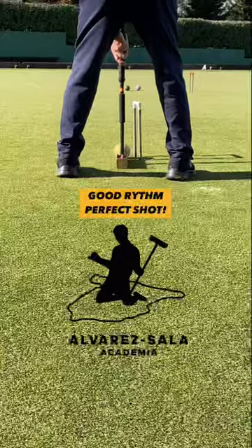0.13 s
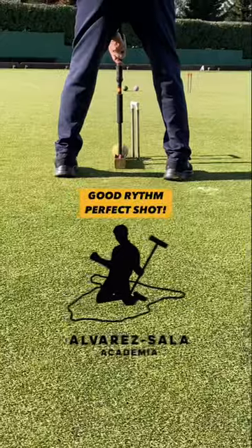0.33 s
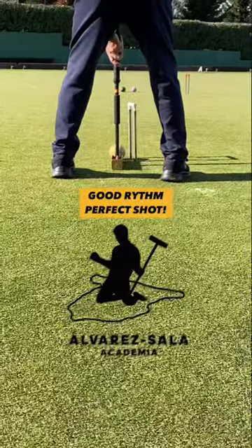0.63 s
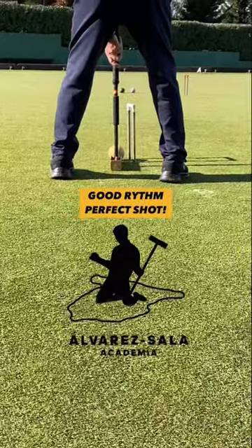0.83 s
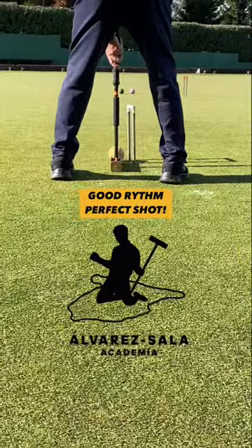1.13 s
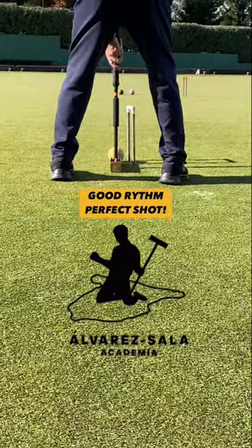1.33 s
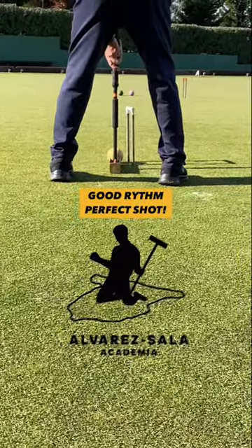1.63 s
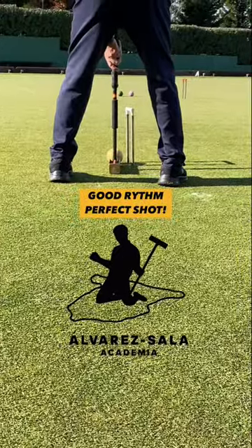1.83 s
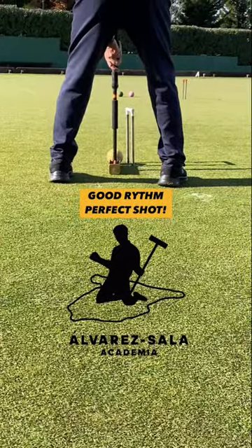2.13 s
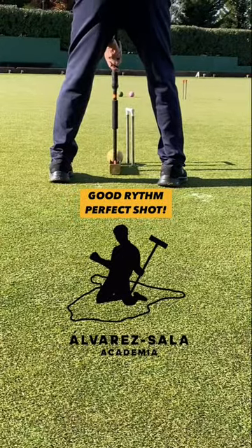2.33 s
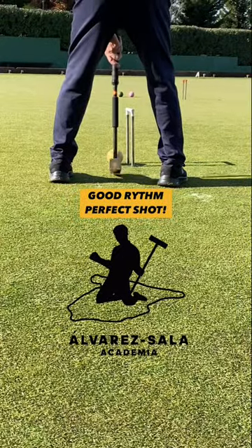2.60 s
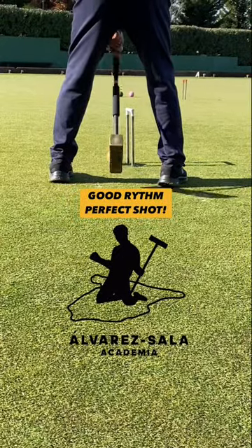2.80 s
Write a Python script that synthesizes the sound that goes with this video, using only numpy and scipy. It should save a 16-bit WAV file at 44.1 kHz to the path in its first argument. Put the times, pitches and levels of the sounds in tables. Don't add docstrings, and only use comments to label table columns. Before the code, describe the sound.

A distant engine drones low throughout, slowly rising in pitch over muffled, receding tyre roar, after a blink of silence. Wind puffs lightly until 0.8 s. At 0.33 and 0.4 s two dull finger taps knock the phone, with a short slide to 0.55 s. Cloth rustles faintly around 0.8 and 1.3-1.6 s; tiny dry ticks and a brush come at 2.5 s. Leaves hiss very softly.

```python
import sys
import numpy as np
from scipy import signal
from scipy.fft import rfft, irfft
from scipy.io import wavfile
from scipy.ndimage import uniform_filter1d

SR = 44100
rng = np.random.default_rng(int(sys.argv[2]) if len(sys.argv) > 2 else 0)


def decibels_to_gain(level_db):
    exponent = np.asarray(level_db, float) / 20
    return 10 ** exponent


def file_out(sig):
    cols = np.atleast_2d(sig).T
    lim = np.clip(cols, -1, 1)
    pcm = np.round(lim * 32767).astype(np.int16)
    wavfile.write(sys.argv[1], SR, pcm)


N = 130536


def read(points, hz):
    f, value = np.transpose(points)
    return np.interp(np.log(hz + 1), np.log(f + 1), value)


def evened(x):
    return x / np.sqrt(np.mean(x ** 2) + 1e-20)


def band_pass(x, order, band_hz):
    return signal.sosfilt(signal.butter(order, band_hz, "band", fs=SR, output="sos"), x)


def stroke(start, rise, hold, fall, db):
    t = np.arange(N) / SR - start
    shape = np.minimum(t / rise, 1 + (rise + hold - t) / fall)
    return decibels_to_gain(db) * np.clip(shape, 0, 1) ** 1.8


def strokes(table):
    return sum(stroke(*row) for row in table)


def field(size, patchy_db, span_hz, span_s):
    frames, hz = 4 * N // size + 5, np.fft.rfftfreq(size, 1 / SR)
    a, b, c, d, patch = rng.standard_normal((frames, len(hz), 5)).T
    patch = uniform_filter1d(patch, 1 + int(span_hz * size / SR), axis=0)
    patch = uniform_filter1d(patch, 1 + int(4 * span_s * SR / size), axis=1)
    patches = decibels_to_gain(patchy_db * evened(patch))
    t = np.arange(frames) * size / 4 / SR
    return hz[:, None], t, (a + 1j * b) * patches, (c + 1j * d) * patches


def sound(z):
    size = 2 * (z.shape[1] - 1)
    return evened(signal.istft(z, nperseg=size, noverlap=3 * size // 4)[1][:, :N])


def hiss(colour, patchy_db):
    hz, t, a, b = field(size=256, patchy_db=patchy_db, span_hz=1500, span_s=.012)
    same = 0.95
    return sound(np.array([a, same * a + np.sqrt(1 - same ** 2) * b]) * decibels_to_gain(read(colour, hz)))


def ports(x):
    hz = np.fft.rfftfreq(N, 1 / SR)
    turn = np.exp(-1j * np.pi * np.maximum(hz - 4180, 0) / 6250)
    return np.array([irfft(rfft(x[0]) / turn, N), irfft(rfft(x[1]) * turn, N)])


# (time [s], firing rate [Hz], first order [dB], second order [dB], third order [dB])
ENGINE_RUN = [(0, 45.75, -41.5, -48, -56), (.2, 46.2, -43.5, -36.5, -51), (.35, 47.06, -45.5, -55.5, -52),
              (0.569, 47.22, -44.5, -45, -55), (.75, 47.68, -46.5, -44.5, -51),
              (.95, 48.33, -44, -44.5, -42.5), (1.12, 48.4, -37.5, -42, -41),
              (1.25, 48.55, -44.5, -41.5, -41), (1.399, 49.12, -39.5, -40, -42.5),
              (1.53, 49.16, -61, -42, -42), (1.75, 49.48, -35.5, -36, -44),
              (1.949, 50.12, -39.5, -40.5, -44), (2.102, 50.33, -62, -37.5, -47),
              (2.279, 50.75, -40.5, -37.5, -46), (2.419, 51.14, -46.5, -37, -48),
              (2.6, 51.76, -40, -37.5, -55), (2.749, 52.12, -34.5, -38, -50), (2.96, 52.8, -35.5, -42, -44)]
# (multiple of firing rate, level [dB])
WEAK_ORDERS = [(1.5, -48), (2.5, -64.5), (4, -61.5), (6, -61.5)]


def engine():
    t, rows = np.arange(N) / SR, np.transpose(ENGINE_RUN)
    waver_hz = 6 * np.geomspace(.1, 1, 20)
    waver = evened(sum(np.sin(2 * np.pi * (f * t + rng.random())) / np.sqrt(f) for f in waver_hz))
    turns = np.cumsum(np.interp(t, rows[0], rows[1]) * (1 + 0.0064 * waver)) / SR
    out = np.zeros(N)
    for k in (1, 2, 3):
        out += np.interp(t, rows[0], decibels_to_gain(rows[1 + k])) * np.cos(2 * np.pi * k * turns)
    for k, db in WEAK_ORDERS:
        out += decibels_to_gain(db) * np.cos(2 * np.pi * (k * turns + rng.random()))
    out *= np.sqrt(2)
    return np.array([out, np.roll(out, 3)])


# (time [s], level [dB], starting pitch [Hz], 60 dB decay [s])
FINGER_TAPS = [
    (.3345, -34, 900, .06),
    (.343, -37, 220, .08),
    (.361, -43, 900, .1),
    (.398, -34.5, 900, .045),
    (.405, -34, 400, .045),
    (.428, -44, 600, .05),
]


def taps():
    out, t = np.zeros(N), np.arange(4000) / SR
    for start, db, hz, t60 in FINGER_TAPS:
        glide = 190 + (hz - 190) * np.exp(-t / .003)
        grit = evened(band_pass(rng.standard_normal(len(t)), 4, [250, 1300]))
        ring = np.sin(2 * np.pi * np.cumsum(glide) / SR) + .4 * grit
        attack = np.minimum(t / .0015, 1)
        out[round(start * SR):][:len(t)] += decibels_to_gain(db - 60 * t / t60) * attack * ring
    rub = evened(band_pass(rng.standard_normal(N), 5, [450, 1400]))
    out += stroke(start=.335, rise=.011, hold=.205, fall=.015, db=-58) * rub
    middle = .1
    return out * np.array([[1 + middle], [middle - 1]])


# (start [s], rise [s], hold [s], fall [s], level [dB])
CRISP_STROKES = [
    (0.783, 0.017, .03, .03, -78.5),
    (1.3, .08, .22, .035, -76.5),
]
# (frequency [Hz], density [dB per Hz])
CRISP_COLOUR = [(2000, -8.5), (4500, 5), (6500, -2.5), (9000, -2), (12300, -1), (13700, -13), (14600, -3.5),
                (16000, -5.5)]
# (start [s], rise [s], hold [s], fall [s], level [dB])
DULL_STROKES = [
    (.775, .03, .046, .05, -76),
    (.328, .006, .012, .03, -91),
    (.395, .01, .015, .02, -86),
    (0.441, 0.1, .03, .02, -87),
    (.535, .006, .1, .02, -83.5),
    (0.878, 0.015, .03, .02, -79.5),
    (1.0, 0.25, 0.045, 0.093, -81.5),
    (2.45, .025, 0.052, 0.028, -79.5),
]
# (frequency [Hz], density [dB per Hz])
DULL_COLOUR = [(2000, -15.5), (4500, 1.5), (6500, -4), (9000, -6.5), (11000, -4.5), (13000, -11),
               (14500, -21.5), (16000, -32.5)]


def cloth():
    crisp = strokes(CRISP_STROKES) * hiss(CRISP_COLOUR, patchy_db=0.0)
    dull = strokes(DULL_STROKES) * hiss(DULL_COLOUR, patchy_db=2.5)
    return ports(crisp + dull)


# (time [s], level [dB], pitch [Hz])
CLOTH_SNAPS = [
    (.3345, -63, 5200),
    (.335, -64, 6200),
    (.553, -71, 5000),
    (.6395, -67.5, 10800),
    (.641, -71.5, 4800),
    (.823, -64, 10280),
    (2.488, -64.5, 6990),
    (2.501, -61, 13300),
    (2.52, -73.5, 10480),
]


def snaps():
    out, t = np.zeros((2, N)), np.arange(200) / SR
    for start, db, hz in CLOTH_SNAPS:
        out[:, round(start * SR):][:, :len(t)] += decibels_to_gain(db - 60 * t / .004) * np.sin(2 * np.pi * hz * t)
    return ports(out)


# (start [s], rise [s], hold [s], fall [s], level [dB])
WIND_PUFFS = [
    (0.025, 0.018, 0.33, .05, -51),
    (.38, 0.027, .12, .03, -59),
    (0.588, .02, .04, .02, -62),
    (0.662, .02, .07, .02, -60),
    (0.774, 0.018, 0.045, .015, -64),
    (2.53, .015, .03, .015, -68),
]


def wind():
    return strokes(WIND_PUFFS) * evened(band_pass(rng.standard_normal(N), 4, (32, 62)))


# (frequency [Hz], density [dB per Hz])
LEAF_COLOUR = [(2000, -22), (4000, -2), (6000, -2.5), (8000, -3), (11000, -7.5), (12500, -4), (14000, -20),
               (16000, -26)]
# (start [s], rise [s], hold [s], fall [s], level [dB])
HEDGE_GUSTS = [
    (.25, .3, 1.8, .3, -85.5),
    (0.301, 0.033, .03, 0.038, -84),
    (0.398, 0.076, 0.11, .12, -86),
    (0.76, .04, 0.085, 0.055, -86),
    (1.098, .3, 0.18, 0.072, -85),
    (2.444, .03, .05, 0.051, -86),
]
# (frequency [Hz], density [dB per Hz])
HEDGE_COLOUR = [(2500, -12.5), (3800, -2.5), (4800, -0.5), (6300, -6.5), (7500, -13.5), (10000, -30.5)]


def hedge():
    leaves = decibels_to_gain(-89.5) * hiss(LEAF_COLOUR, patchy_db=0.5)
    return ports(leaves + strokes(HEDGE_GUSTS) * hiss(HEDGE_COLOUR, patchy_db=4.5))


# (middle [s], length [s], pitch [Hz], level [dB], left over
# right [dB])
PASSING_HUMS = [(0.11, 0.35, 260, -45.5, 5), (0.3, 0.1, 296, -45.5, -8.5), (1.153, 0.25, 127, -40.5, 0),
                (2.564, 0.32, 78, -35, -1), (.406, 0.026, 2550, -57.5, -0.5), (.404, .02, 1900, -59, 2),
                (0.36, .025, 3500, -64.5, 0), (.335, 0.011, 1400, -60, 2), (.57, 0.095, 133, -33.5, 1),
                (.79, .1, 102, -39.5, 0), (2.35, 0.28, 128, -45.5, 0), (2.6, 0.29, 330, -54, 0.5),
                (2.3, 0.17, 700, -56, -0.5), (1.25, 0.15, 3300, -71, 1), (.34, .02, 5600, -79, 0),
                (.12, 0.32, 165, -47, 0.5), (2.8, 0.13, 120, -47, -1.5), (1.48, .3, 230, -50, -1),
                (2.036, .16, 230, -47.5, -1), (2.27, .03, 110, -28.5, -1), (2.8, .2, 220, -50, 1),
                (1.52, 0.35, 2950, -67.5, 3.5), (2.85, 0.24, 800, -56, -0.5),
                (2.55, 0.23, 850, -58.5, -0.5), (2.42, .15, 280, -51, 0.5), (1.5, 0.051, 225, -46, 0),
                (2.56, .06, 130, -41.5, -1), (2.8, .1, 330, -52, -1), (.546, .02, 10600, -89, 0),
                (.6, .09, 9100, -88, -2), (0.59, .04, 6300, -85, 1), (1.014, .008, 660, -51.5, -2),
                (1.988, 0.0073, 880, -49, -0.5), (2.096, 0.0073, 800, -50, -3.5),
                (2.697, .008, 800, -55, 1), (1.9, 0.21, 160, -56, -3)]


def swells():
    t, out = np.arange(N) / SR, np.zeros((2, N))
    for mid, length, hz, db, pan_db in PASSING_HUMS:
        bump = np.cos(np.pi * np.clip((t - mid) / length, -.5, .5))
        drift = evened(uniform_filter1d(rng.standard_normal(N), 1 + int(SR / hz * 2)))
        tone = np.sin(2 * np.pi * hz * np.cumsum(1 + .06 * drift) / SR)
        out += decibels_to_gain(db + pan_db * np.array([[.5], [-.5]])) * bump * tone
    return out


# (frequency [Hz], density [dB per Hz])
ROAR = [(50, -7.5), (100, -6.5), (200, -11.5), (300, -16), (600, -27), (1130, -31.5), (1380, -42),
        (3000, -45)]
# (frequency [Hz], gain [dB])
AIR_LOSS = [(3050, 1.5), (3450, -6), (4250, -11.5), (4500, -20), (5300, -24.5), (6500, -33.5), (8000, -46)]
# (frequency [Hz], side under middle [dB])
ROAR_WIDTH = [(80, -31), (200, -22), (350, -12.5), (800, -10), (1500, -7.5), (1900, -11), (2800, -12),
              (4500, -14)]
# (time [s], level [dB])
DISTANCE = [(0, 2.5), (.3, 2), (.6, 1.5), (1, -0.5), (1.5, 0.5), (1.9, -1.5), (2.4, -0.5), (2.75, -3),
            (2.96, 0.5)]
# (frequency [Hz], share)
DISTANCE_SHARE = [(100, 0.033), (300, 0.12), (900, 0.5), (2000, 1.7), (3000, .9), (3600, 0.05),
                  (4200, -0.29), (5500, 0.22)]


def traffic():
    hz, t, mid, side = field(size=2048, patchy_db=1.46, span_hz=149.1, span_s=.08)
    lean = .13 * np.exp(-np.log((hz + 1) / 600) ** 2 / .6)
    side = decibels_to_gain(read(ROAR_WIDTH, hz)) * side - lean * mid
    distance = read(DISTANCE_SHARE, hz) * np.interp(t, *np.transpose(DISTANCE))
    level = decibels_to_gain(read(ROAR, hz) + read(AIR_LOSS, hz) + distance)
    far = decibels_to_gain(-39) * sound(np.array([mid + side, mid - side]) * level)
    shaded = signal.sosfiltfilt(signal.butter(2, (550, 1100), "band", fs=SR, output="sos"), far)
    return far - stroke(start=.33, rise=.02, hold=.07, fall=.03, db=-6) * shaded


# (frequency [Hz], side gain [dB])
NARROW_MIDDLE = [(2900, 0), (3200, -22), (4150, -18), (4250, 8), (4650, 8), (4900, -18), (5150, -14),
                 (5400, 0)]
# (frequency [Hz], side gain [dB])
NARROW_TREBLE = [(9500, 0), (9700, -20), (11300, -20), (11600, 0), (13300, 0), (14300, -5), (15200, -12),
                 (15700, -20)]


def narrowed(side):
    hz, soft = np.fft.rfftfreq(N, 1 / SR), signal.windows.tukey(N, .004)
    return irfft(rfft(soft * side) * decibels_to_gain(read(NARROW_MIDDLE, hz) + read(NARROW_TREBLE, hz)), N)


def gaps(side):
    hz, t, z = signal.stft(side, SR, nperseg=1024)
    luck = uniform_filter1d(rng.standard_normal(z.shape[::-1]).T, 10, axis=0)
    luck = uniform_filter1d(luck, 5, axis=1)
    band = (hz > 1950) & (hz < 4150)
    shut = (luck < np.quantile(luck, .68)) & (t > .45) & band[:, None]
    return signal.istft(z * ~shut, SR, nperseg=1024)[1][:N]


# (from [s], to [s])
BASS_FOLDS = [(.5, .59), (.85, .89), (1.01, 1.09), (1.22, 1.3), (1.46, 1.55), (1.6, 1.83), (1.89, 2.0),
              (2.05, 2.18), (2.22, 2.27), (2.33, 2.36), (2.4, 2.53), (2.67, 2.74), (2.77, 2.79)]


def folded(side):
    t, hz = np.arange(N) / SR, np.fft.rfftfreq(N, 1 / SR)
    shut = uniform_filter1d(sum(1. * ((t > a) & (t < b)) for a, b in BASS_FOLDS), 500)
    deep_shut = uniform_filter1d(1. * (t > .86), 500)
    side = side - deep_shut * irfft(rfft(side) * (hz < 82), N)
    return side - shut * irfft(rfft(side) * (hz < 165), N)


def scene():
    return engine() + taps() + cloth() + snaps() + hedge() + swells() + traffic()


def roll_off(x):
    return signal.sosfilt(signal.butter(12, 15750, fs=SR, output="sos"), x)


def record(dry):
    t = np.arange(N) / SR
    x = signal.sosfilt(signal.butter(6, 41.5, "high", fs=SR, output="sos"), dry)
    side = folded(gaps(narrowed((x[0] - x[1]) / 2))) + wind()
    whine = decibels_to_gain(-110) * sum(np.sin(2 * np.pi * hz * t) for hz in (11900, 12200))
    x = x.mean(0) + np.array([side, -side]) + whine
    gate = np.clip((t - .0361) / .0008, 0, 1)
    return roll_off(x * gate)


dry = scene()
out = record(dry)
file_out(out)
```